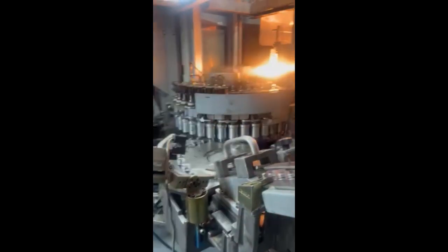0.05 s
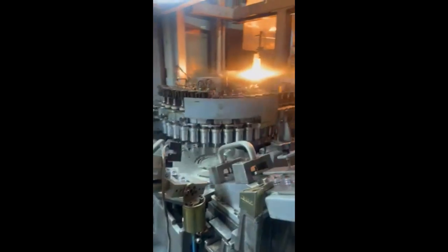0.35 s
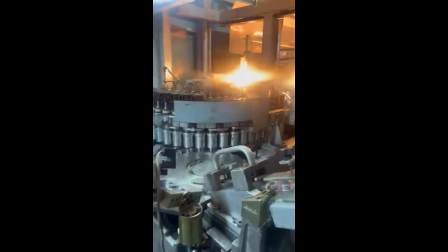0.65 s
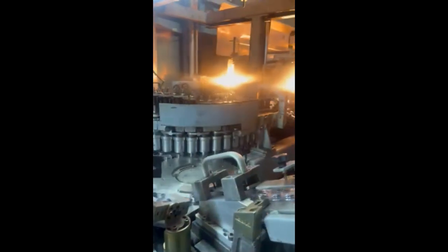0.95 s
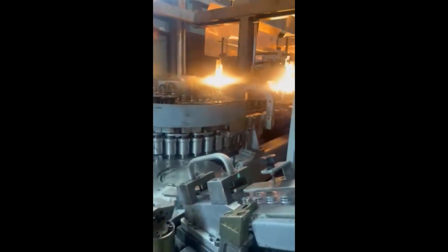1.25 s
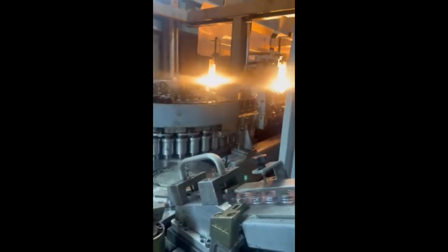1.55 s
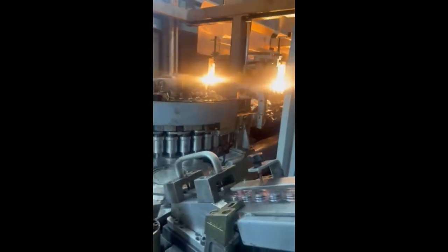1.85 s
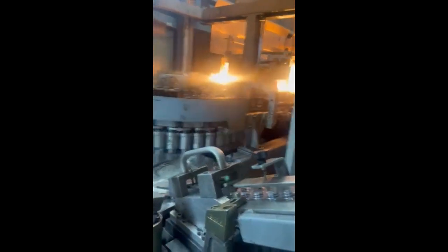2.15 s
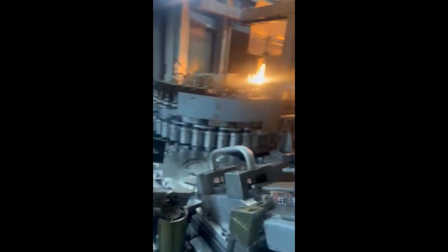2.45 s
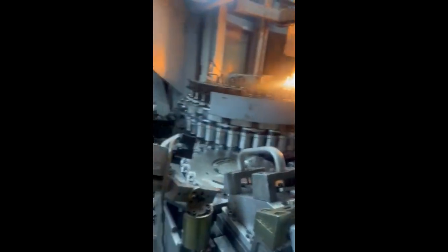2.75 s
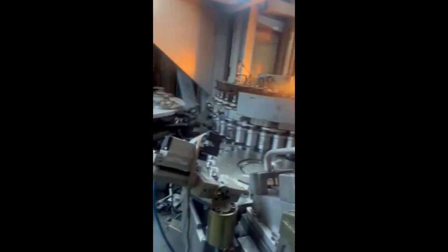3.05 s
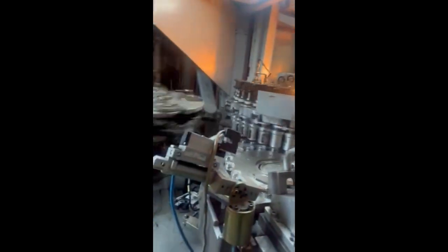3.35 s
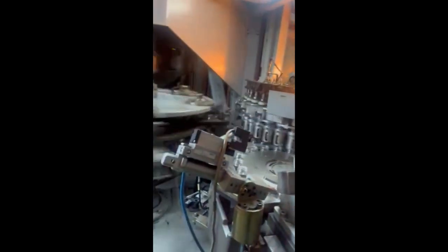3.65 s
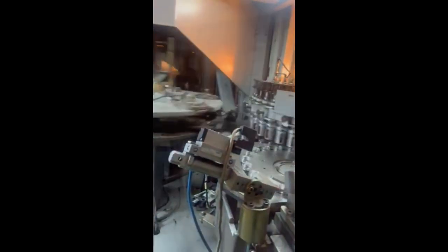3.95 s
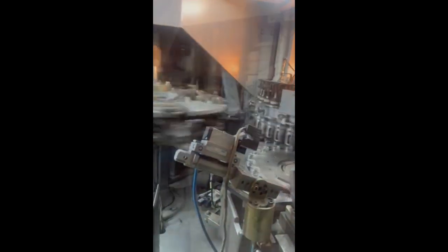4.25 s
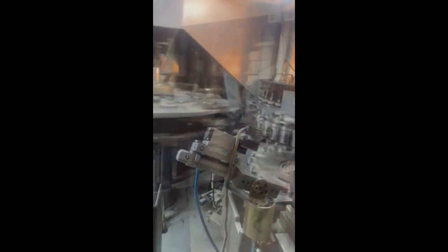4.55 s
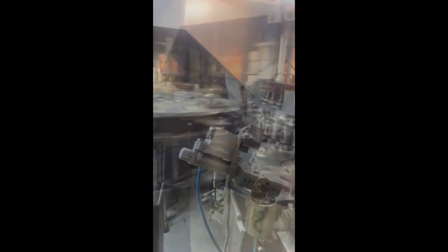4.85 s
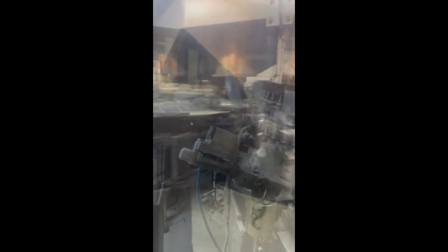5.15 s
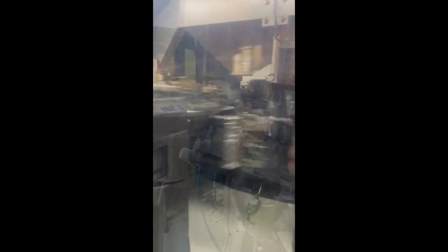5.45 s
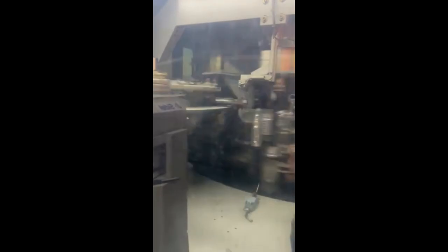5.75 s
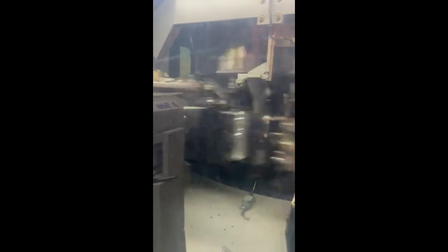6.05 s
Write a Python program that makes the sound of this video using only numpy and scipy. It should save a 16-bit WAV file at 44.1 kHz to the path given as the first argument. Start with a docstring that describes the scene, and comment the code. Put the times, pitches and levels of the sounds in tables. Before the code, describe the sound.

A loud factory machine runs close by in a fast, even rhythm of sharp air blasts and clattering steel moulds, over roaring flames, knocking linkages and a thumping frame. After about four seconds it fades, then briefly drops to silence. The machine comes back duller from behind its guard panels, the strokes blurred into a rush with a low hum, short hisses and hollow booms as the roar grows.

```python
"""In a glass-bottle factory, close to a rotary blow moulding machine with twelve stations. Almost five stations
come round each second. At each one an air valve blows off and a mould clacks shut, while linkages knock and the
frame thumps over the roar of burners and drive. The sound fades, then the scene changes to behind the machine's
guard, duller and with a swelling low roar."""
import sys
import numpy as np
from scipy import signal
from scipy.fft import rfft, irfft
from scipy.io import wavfile

SR = 44100
rng = np.random.default_rng(int(sys.argv[2]) if len(sys.argv) > 2 else 0)


def to_wav(s):
    """Save 16-bit WAV."""
    ch = np.atleast_2d(s).T  # columns
    pcm = np.round(np.clip(ch, -1, 1) * 32767)  # PCM
    wavfile.write(sys.argv[1], SR, pcm.astype(np.int16))


N = 277830
TIME, HZ = np.arange(N) / SR, np.fft.rfftfreq(N, 1 / SR)


def gain_of(db):
    """Turn decibels into a multiplier."""
    return 10 ** (np.asarray(db) / 20)


def unit_level(x):
    """Scale a signal to an average power of one."""
    return x / np.sqrt(np.mean(x ** 2) + 1e-20)


def curve(points):
    """Join (Hz, value) points with straight lines on a log-frequency axis."""
    hz, value = np.transpose(points)
    return np.interp(np.log(HZ + 1), np.log(hz + 1), value)


def follow(rows, column):
    """Turn one column of decibels into a gain that changes over time."""
    rows = np.array(rows)
    return gain_of(np.interp(TIME, rows[:, 0], rows[:, column]))


def wander(rate_hz):
    """A random wobble, no faster than about the given rate."""
    return unit_level(irfft(rfft(rng.standard_normal(N)) / (1 + (HZ / rate_hz) ** 4), N))


def housing(depth, count):
    """Echoes off nearby steel panels lift some frequencies and sink others, less so in the treble."""
    delay_s, sign = rng.uniform(.002, .04, count), rng.choice([-1, 1], count)
    echoes = np.zeros(N)
    echoes[(delay_s * SR).astype(int)] = sign * depth / np.sqrt(count)
    return 1 + rfft(echoes) / np.sqrt(1 + HZ / 4000)


def noise(spectrum, lift_db=0, grain_db=0):
    """Two unrelated shaped noises, heard in the housing; grain makes them crackle."""
    source = rng.standard_normal((2, N)) * gain_of(grain_db * wander(570))
    colour = gain_of(curve(spectrum) + lift_db) * housing(depth=0.28, count=12)
    return unit_level(irfft(rfft(source) * colour, N))


def band_db(hz, width_hz):
    """A curve in dB that keeps only a narrow band around one pitch."""
    return -20 * np.log10(1 + ((HZ - hz) / width_hz) ** 2)


def burst(start, rise, hold, t60):
    """A level that rises, holds, then falls 60 dB in t60; all times are in seconds."""
    opening = .5 + .5 * np.tanh((TIME - start) / rise)
    return opening * gain_of(-60 * np.maximum(TIME - start - hold, 0) / t60)


def strike(blows, tones, rise, spread, scatter=1):
    """Each blow (seconds, dB) rings a part's tones, a bit detuned; low scatter starts them in step."""
    t, out = np.arange(SR // 2) / SR, np.zeros((2, N + SR))
    hz, db, t60 = np.transpose(tones)[:, :, None]
    decay = gain_of(db - 60 * t / t60)
    for s, level_db in blows:
        detune = 1 + spread * rng.standard_normal(hz.shape)
        phase = rng.random((2, 1, 1)) + scatter * rng.random((2, len(hz), 1))
        waves = np.sin(2 * np.pi * (hz * detune * t + phase))
        ring = (decay * waves).sum(1) * (1 - np.exp(-t / rise))
        early_level = np.sqrt(np.mean(ring[:, :SR // 25] ** 2, 1, keepdims=True))
        start = round(s * SR)
        out[:, start:start + len(t)] += gain_of(level_db) * ring / early_level
    return out[:, :N]


def pitched_strikes(blows, tones, rise, spread):
    """Strike the same set of tones at each blow's own pitch."""
    return sum(strike([(s, db)], [(hz * k, tone_db, t60) for k, tone_db, t60 in tones], rise, spread)
               for s, db, hz in blows)


# Narrow peaks in the running noise. Each row: pitch in Hz, width in Hz, lift in dB.
WHISTLE_PEAKS = [(84, 16, 3.5), (215, 24, 3), (335, 25, 2), (440, 30, 1.5), (4048, 11, 5.5),
                 (4970, 260, 2.2), (8027, 35, 2.4), (12370, 60, 2.2)]
def whistles():
    """The lift in dB from the resonances that the air jets set off."""
    return sum(db / (1 + (2 * (HZ - hz) / width) ** 2) for hz, width, db in WHISTLE_PEAKS)


# The open machine fading. Each row: time in seconds, gain of burners and steel in dB, gain of air in dB.
OPEN_FADE = [(0, 1.5, 0), (2.2, 0.5, 1.5), (3.85, 0.5, 0.5), (4.3, -2, -2), (4.7, -5, -4),
             (4.83, -5.5, -3.5)]
# The colour of the roar and the hiss. Each row: frequency in Hz, relative level in dB.
ROAR_SPECTRUM = [(20, -18), (40, -5), (60, -3), (82, -1), (115, 1.5), (175, -0.5), (270, -2), (450, -0.5),
                 (700, -5.5), (1100, -11), (1800, -12), (3000, -18), (6000, -25)]
HISS_SPECTRUM = [(800, -1), (2000, -11), (2600, 5), (3300, 7.5), (4000, 8), (5000, 8.5), (6500, 8),
                 (8700, 7), (10000, 4), (12500, 6), (14000, 1.5), (16000, -4.5)]
def burners():
    """Flames and drive roar, turbulence swelling each band on its own, while cooling air hisses."""
    bands_hz = np.geomspace(60, 2500, 9)
    source, churn = rfft(noise(ROAR_SPECTRUM, whistles())), 0
    for share in np.eye(len(bands_hz)):
        band = irfft(source * curve(np.c_[bands_hz, share]), N)
        churn = churn + band * gain_of(2 * wander(20))
    roar = unit_level(churn) * follow(OPEN_FADE, column=1) * gain_of(-22.5)
    flutter_db = .6 * wander(23)
    hiss = noise(HISS_SPECTRUM, whistles(), grain_db=0.5) * gain_of(-29 + flutter_db)
    return roar + hiss * follow(OPEN_FADE, column=2)


def casing():
    """A loose panel, shaken by the machine, sings with a wavering level."""
    return noise(ROAR_SPECTRUM, band_db(612, width_hz=26)) * gain_of(-38.5 + wander(18))


# Heavy strokes. Each row: start in seconds, relative level in dB.
FRAME_STROKES = [(.025, -21), (.15, -18), (.39, -17.5), (.602, -19), (.755, -29), (.812, -22), (1.02, -19),
                 (1.218, -15), (1.442, -16), (1.652, -20), (2.078, -17), (2.512, -26), (2.718, -17.5),
                 (2.796, -21), (2.962, -20), (3.136, -18), (3.762, -16), (3.91, -24), (4.615, -21),
                 (5.252, -25.5), (5.885, -18.5), (6.095, -17.5), (6.2, -21.5)]
# The frame's tones. Each row: pitch in Hz, relative level in dB, seconds to fall 60 dB.
FRAME_TONES = [(74.6, -11, 0.1), (82.5, -1.5, 0.24), (142, -4.5, 0.17), (220, -12, 0.1)]
def frame_thumps():
    """The heavy frame takes up each stroke with a short low thump."""
    return gain_of(-5.5) * strike(FRAME_STROKES, FRAME_TONES, rise=0.02, spread=0.069)


TURN_S = 2.536  # one full turn of the machine
def every_turn(rows):
    """Repeat rows that start with a time within the turn, until the sound ends."""
    turns = np.arange(0, N / SR, TURN_S)
    return [(s + turn, *rest) for turn in turns for s, *rest in rows if s + turn < N / SR]


# The twelve stations. Each row: seconds into the turn when the valve opens, air level in dB,
# seconds it stays open, seconds from its opening until the mould shuts, then the levels in dB of
# the clatter, the mould carrier's ring and the blowing air. All levels are relative.
STATION_CYCLE = [(.129, -20, 0.022, .026, -25.5, -28, -22.5), (.342, -17, 0.011, 0.029, -22.5, -36, -25),
                 (.555, -17.5, 0.007, 0.02, -24.5, -33, -25), (.762, -16.5, 0.0037, .036, -23, -34, -45),
                 (.974, -19, 0.0092, .027, -22, -24, -26.5),
                 (1.184, -16.5, 0.011, 0.025, -19, -26.5, -35.5),
                 (1.374, -18.5, 0.044, 0.027, -24.5, -27, -26), (1.597, -22, 0.059, .010, -30, -28.5, -25),
                 (1.814, -21, 0.024, 0.047, -24.5, -51, -22), (2.028, -16.5, 0.0046, 0.031, -23, -25, -23),
                 (2.238, -19.5, 0.02, 0.024, -29, -29.5, -25), (2.454, -19.5, 0.018, 0.017, -27, -23, -44)]
# The colour of escaping air. Each row: frequency in Hz, relative level in dB.
AIR_SPECTRUM = [(500, 11), (1500, 10), (3000, 3), (4000, 8), (5000, 4.5), (6500, 9), (8000, 5.5),
                (12500, 6.5), (14000, 1.5), (16000, 3)]
def air_valves():
    """Air spits out bright with a gritty whistle and dulls as it dies; more then blows into the mould."""
    open_s, blow_after_s = .008, .083
    spit = tail = blow = 0
    for s, air_db, hold, _, _, _, blow_db in every_turn(STATION_CYCLE):
        spit += gain_of(air_db) * burst(s, rise=open_s, hold=hold, t60=0.26)
        tail += gain_of(air_db) * burst(s + open_s, rise=2 * open_s, hold=hold, t60=0.33)
        blow += gain_of(blow_db) * burst(s + blow_after_s, rise=open_s, hold=0.057, t60=0.1)
    octaves = np.log2((HZ + 500) / 6000)  # adding this brightens, subtracting it dulls
    bright = noise(AIR_SPECTRUM, whistles() + 2.4 * octaves, grain_db=-0.5) * spit * gain_of(-3)
    dull = noise(AIR_SPECTRUM, 2 * whistles() - 2 * octaves, grain_db=0.5) * tail * gain_of(-4.5)
    blowing = noise(AIR_SPECTRUM, whistles() + 0.64 * octaves, grain_db=-2.5) * blow * gain_of(-6)
    whistle = noise(AIR_SPECTRUM, band_db(4950, width_hz=260), grain_db=1.5) * spit * gain_of(-16)
    sputter = gain_of(0.47 * wander(48))
    return (bright + dull + blowing + whistle) * sputter


# The colour of the clatter. Each row: frequency in Hz, relative level in dB.
CLATTER_SPECTRUM = [(200, -33), (450, -14), (700, 1), (1050, 7.5), (1400, -2), (1900, 0.5), (2800, 0.5),
                    (5000, -5), (9000, -37), (16000, -35)]
# The carrier that holds a mould. Each row: pitch in Hz, relative level in dB, seconds to fall 60 dB.
CARRIER_TONES = [(335.5, -11, 0.6), (401, 1, 0.084), (438, 2.5, 0.12), (460, -22, 0.21), (599, -11, 0.2),
                 (758, -21, 0.7), (887, -8, 0.08), (1110, -1, 0.064), (1166, -21, 0.17), (1370, -17, 0.13),
                 (1800, -27, 0.23)]
CARRIER_DELAY_S = 0.00608
def moulds():
    """Mould halves meet with a dense steel clatter; their carrier rings just after."""
    rattle, blows = 0, []
    for s, _, _, lag, clatter_db, ring_db, _ in every_turn(STATION_CYCLE):
        rattle += gain_of(clatter_db) * burst(s + lag, rise=0.0088, hold=.006, t60=0.3)
        blows.append((s + lag + CARRIER_DELAY_S, ring_db))
    clatter = noise(CLATTER_SPECTRUM, grain_db=1.5) * rattle * gain_of(-3)
    return clatter + gain_of(-2.5) * strike(blows, CARRIER_TONES, rise=0.003, spread=0.0243)


def chinks():
    """Loose steel parts jostle for a moment after each mould shuts."""
    count, within_s, t60 = 4, .055, .029
    t, out = np.arange(SR // 20) / SR, np.zeros((2, N + SR))
    for s, _, _, lag, clatter_db, *_ in every_turn(STATION_CYCLE):
        envelope = (1 - np.exp(-t / .0006)) * gain_of(clatter_db - 2.5 - 60 * t / t60)
        for delay in rng.uniform(0, within_s, count):
            hz = np.exp(rng.uniform(np.log(950), np.log(4800), (3, 1)))
            waves = np.sin(2 * np.pi * (hz * t + rng.random((2, 3, 1))))
            ring = (np.sqrt(hz.min() / hz) * waves).sum(1)  # higher tones are weaker
            start = round((s + lag + delay) * SR)
            out[:, start:start + len(t)] += ring * envelope
    return out[:, :N]


# Dull knocks. Each row: start in seconds, level in dB, pitch in Hz.
LINKAGE_KNOCKS = [(.25, -29, 549), (.465, -31, 429), (.662, -32, 598), (.69, -27, 425), (.894, -26.5, 354),
                  (.94, -37, 745), (.995, -25, 438), (1.333, -31, 324), (1.53, -25, 332),
                  (1.944, -23.5, 340), (2.16, -24.5, 333), (2.576, -31, 562), (2.796, -27, 326),
                  (3.208, -27, 610), (3.348, -27.5, 503), (3.425, -31, 335), (3.585, -31, 614),
                  (3.63, -30.5, 603), (3.879, -25.5, 441), (4.169, -44, 452)]
# A linkage's tones. Each row: multiple of the pitch, relative level in dB, seconds to fall 60 dB.
LINKAGE_TONES = [(1.002, 3.5, 0.073), (1.36, -9, 0.046), (1.82, -13, 0.11), (2.7, -37, .05)]
def linkages():
    """Levers and linkages knock as they take up their slack, each at its own pitch."""
    return pitched_strikes(LINKAGE_KNOCKS, LINKAGE_TONES, rise=0.008, spread=0.005)


# Hard slams, a turn apart. Each row: start in seconds, then latch, carrier and crunch levels in dB.
SLAMS = [(.360, -28, -19, -24.5), (2.897, -21.5, -18.5, -28)]
# The latch's tones. Each row: pitch in Hz, relative level in dB, seconds to fall 60 dB.
LATCH_TONES = [(860, -5, .04), (905, -13, .06), (1070, 1, .03), (1180, -2, .03), (1373, -11, .1),
               (1567, -12, .1), (2000, -11, .06), (2654, -12, .07), (3850, -18, .05), (5100, -16, .05)]
# The colour of the crunch. Each row: frequency in Hz, relative level in dB.
CRUNCH_SPECTRUM = [(300, -36), (600, -20), (1100, -7), (1600, 2), (2200, 4), (2800, -2), (4000, -8),
                   (9000, -35)]
def slamming_mould():
    """One mould slams: its latch knocks, the halves crunch together and the carrier rings deeper."""
    latch = strike([(s, db) for s, db, _, _ in SLAMS], LATCH_TONES, rise=.0007, spread=.006)
    carrier_blows = [(s + CARRIER_DELAY_S, db) for s, _, db, _ in SLAMS]
    carrier = strike(carrier_blows, CARRIER_TONES, rise=.003, spread=.008, scatter=.15)
    seating = sum(gain_of(db) * burst(s, rise=.002, hold=.022, t60=.14) for s, _, _, db in SLAMS)
    return latch + carrier + noise(CRUNCH_SPECTRUM, grain_db=3) * seating


# Light touches, a turn apart. Each row: start in seconds, level in dB.
PING_TOUCHES = [(.582, -25), (3.119, -31)]
# The touched part's tones. Each row: pitch in Hz, relative level in dB, seconds to fall 60 dB.
PING_TONES = [(1840, -15, 0.069), (1846, -2, 0.099), (1740, -1, 0.1), (2030, -14, .1), (2550, -20, .1)]
def steel_ping():
    """A light steel part pings when it is touched."""
    return strike(PING_TOUCHES, PING_TONES, rise=0.0016, spread=0.0032)


# Behind the guard. Each row: time in seconds, then relative levels of roar, rush and hiss in dB.
GUARD_LEVELS = [(4.91, -25.5, -22.5, -45.5), (5.1, -30, -21.5, -40.5), (5.25, -26.5, -23.5, -40.5),
                (5.58, -26, -26, -40.5), (5.7, -20.5, -29, -39.5), (5.85, -20.5, -27, -38),
                (5.99, -18, -24, -38), (6.3, -23, -21, -41.5)]
# The colours of those three noises. Each row: frequency in Hz, relative level in dB.
GUARD_ROAR = [(20, -20), (45, -18), (82, -7), (120, -3), (165, 1.5), (250, -1), (360, 2.5), (450, -15),
              (700, -35), (1100, -23), (3000, -41)]
GUARD_RUSH = [(250, -5.5), (400, -4), (500, -2), (600, -4), (720, -7.5), (850, -13.5), (1080, -13),
              (1200, -34), (1500, -24), (3000, -61)]
GUARD_HISS = [(500, -21), (900, 9), (1200, 13), (1700, 16), (2200, 11.5), (2700, 14.5), (4000, 10),
              (5000, 7.5), (8000, 4), (11000, -0.5), (13000, -4), (16000, -17)]
def guard_noise():
    """The guard's panels roar, and behind them the strokes blur into a rush and a duller hiss."""
    roar = noise(GUARD_ROAR) * follow(GUARD_LEVELS, column=1) * gain_of(-1.5 + 0.82 * wander(30))
    rush = noise(GUARD_RUSH) * follow(GUARD_LEVELS, column=2) * gain_of(-2.5 + 1.1 * wander(34))
    hiss = noise(GUARD_HISS, whistles(), grain_db=1) * follow(GUARD_LEVELS, column=3)
    return roar + rush + hiss * gain_of(10.5 + .5 * wander(36))


# How the hum swells and sinks. Each row: time in seconds, level in dB.
HUM_LEVELS = [(4.91, -49), (5.06, -25), (5.2, -42), (5.55, -29), (5.68, -27), (5.87, -32), (6.1, -30),
              (6.3, -25)]
def hollow_hum():
    """The hollow space behind the guard hums around one low pitch."""
    return noise(GUARD_ROAR, band_db(240, width_hz=47)) * follow(HUM_LEVELS, column=1)


# Puffs of air. Each row: start in seconds, level in dB, seconds before it starts to fade.
AIR_LEAKS = [(5.008, -38, .04), (5.376, -31, 0.073), (5.646, -35, 0.28)]
def leaks():
    """Air escapes behind the guard in short hisses."""
    puffs = sum(gain_of(db) * burst(s, rise=.006, hold=hold, t60=0.5) for s, db, hold in AIR_LEAKS)
    return noise(AIR_SPECTRUM) * puffs


# Booms of the guard. Each row: start in seconds, level in dB, pitch in Hz.
PANEL_BOOMS = [(5.032, -21.5, 250), (5.28, -30, 335), (5.715, -24, 240), (5.864, -20, 250),
               (5.896, -25, 345), (5.96, -19.5, 255), (5.989, -22.5, 235), (6, -21, 345),
               (6.043, -23.5, 335), (6.174, -20.5, 275)]
# A panel's tones. Each row: multiple of the pitch, relative level in dB, seconds to fall 60 dB.
PANEL_TONES = [(.66, -10, .06), (1, 0, .08), (1.3, -10, .05), (2.1, -12, .035), (2.7, -21, .04)]
def guard_booms():
    """The guard panels buckle and drum with short hollow thuds."""
    return pitched_strikes(PANEL_BOOMS, PANEL_TONES, rise=.005, spread=.01)


# How alike left and right are. Each row: frequency in Hz, likeness from 0 to 1.
STEREO_LIKENESS = [(30, .95), (100, .99), (300, .97), (600, .9), (950, .68), (2000, .66), (2800, .76),
                   (4500, .58), (5200, .66), (5750, .96), (6200, .97), (7000, .75), (8000, .88),
                   (12000, .9), (16000, .88)]
# Their balance. Each row: frequency in Hz, left level minus right level in dB.
STEREO_BALANCE = [(60, -.5), (130, -1.2), (260, -2.1), (550, -5), (950, -5), (1500, -1.2), (2500, -.7),
                  (4600, -1.8), (5600, 0), (16000, 0)]
# Their timing. Each row: frequency in Hz, how far the left wave is ahead in radians.
STEREO_LEAD = [(0, 0), (250, -.62), (600, -1.1), (1150, 0), (1700, .25), (2600, 2.3), (4400, 2),
               (5200, 1.4), (5750, 2.8), (6200, 3.4), (7700, 6.1), (8700, 6.5), (9800, 9.2), (10800, 9.7),
               (11900, 12.4), (13000, 12.7), (14000, 15.4), (16000, 16.2)]
def stereo(pair):
    """Left and right share most of the sound, by paths of different length; the right is louder."""
    direct, diffuse = rfft(pair)
    likeness = np.clip(curve(STEREO_LIKENESS), 0, 1)
    tilt = gain_of(curve(STEREO_BALANCE) / 2)
    lead = np.exp(1j * np.interp(HZ, *np.transpose(STEREO_LEAD)))
    left = (likeness * direct + np.sqrt(1 - likeness ** 2) * diffuse) * lead * tilt
    return irfft(np.array([left, direct / tilt]), N)


def scene():
    """The open machine, a short silence, then the guarded side, where thumps and some air get through."""
    stop_s, resume_s = 4.845, 4.904
    dying_away = gain_of(-13) * np.exp(-np.maximum(TIME - stop_s, 0) / .009)
    before = np.where(TIME < stop_s, 1, dying_away)
    after = np.clip((TIME - resume_s) / .001, 0, 1)
    air, thumps = air_valves(), frame_thumps()
    open_side = burners() + air * follow(OPEN_FADE, column=2) + thumps
    open_side += (moulds() + chinks() + casing()) * follow(OPEN_FADE, column=1)
    open_side += slamming_mould() + linkages() + steel_ping()
    guarded_side = guard_noise() + hollow_hum() + leaks() + guard_booms() + air * gain_of(-14.5) + thumps
    return stereo(open_side * before + guarded_side * after)


def record(dry):
    """Thin the deepest bass, round off the highest peaks and cut the very top of the treble."""
    thinned = signal.sosfilt(signal.butter(3, 38, "high", fs=SR, output="sos"), dry)
    rounded = thinned / (1 + (thinned / .95) ** 4) ** .25
    treble_cut = signal.firwin(1023, 15780, window=("kaiser", 9), fs=SR)
    return signal.oaconvolve(rounded, treble_cut[None], "same")


dry = scene()
out = record(dry)
to_wav(out)
```